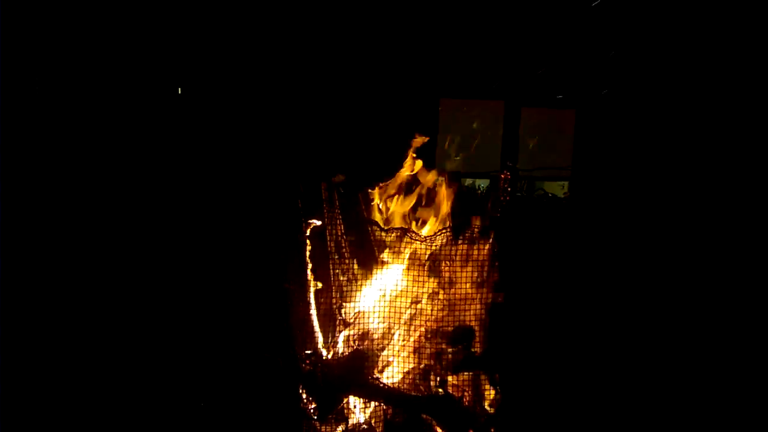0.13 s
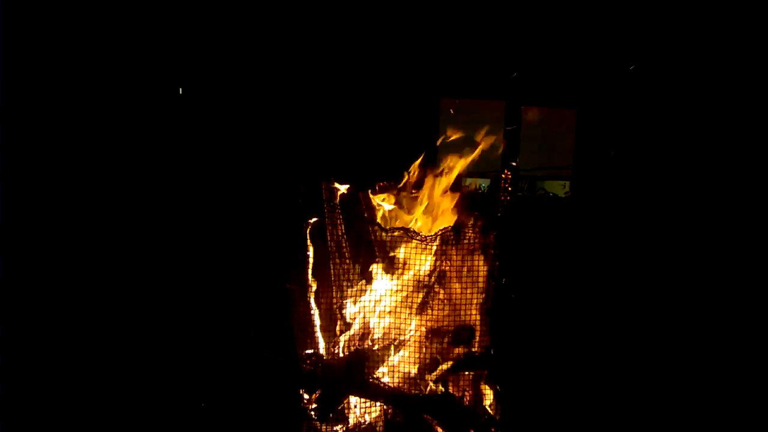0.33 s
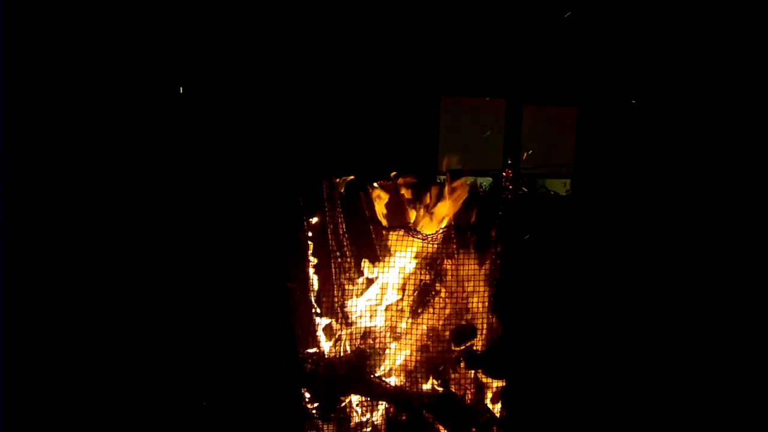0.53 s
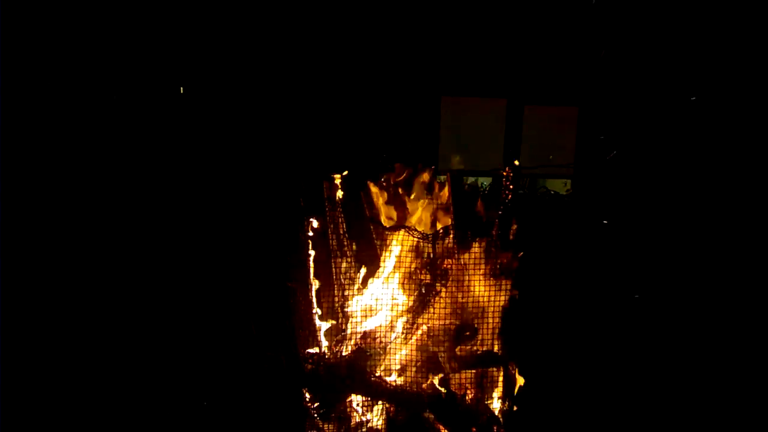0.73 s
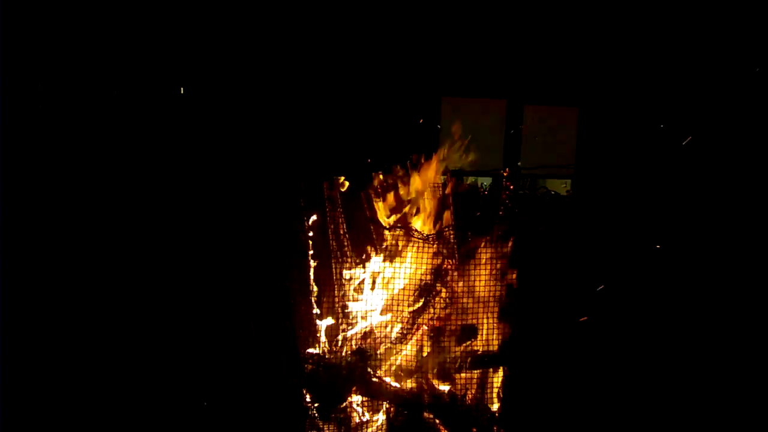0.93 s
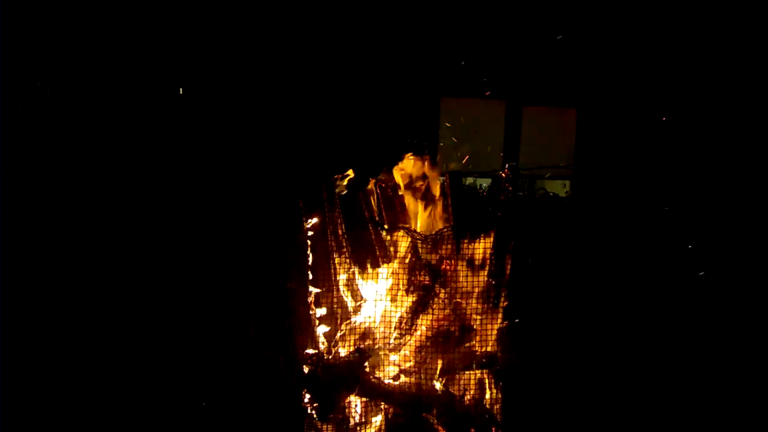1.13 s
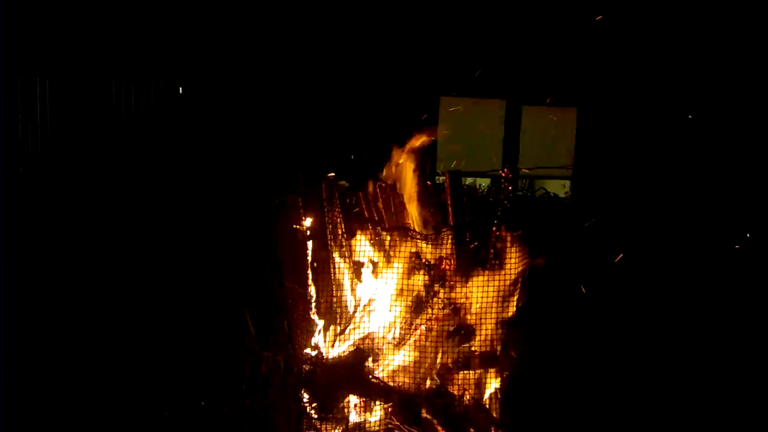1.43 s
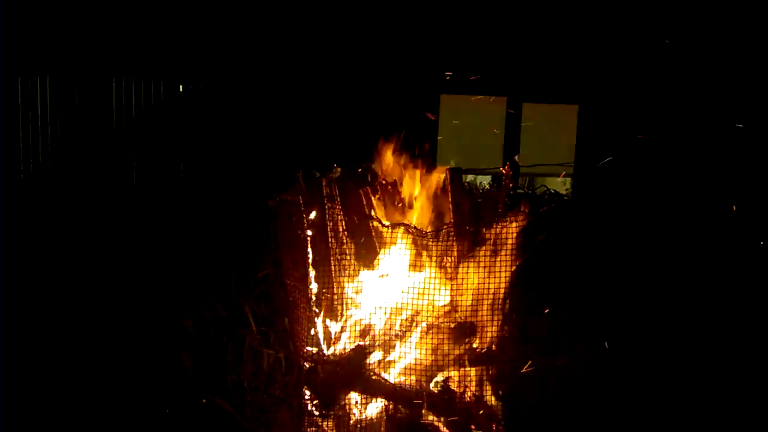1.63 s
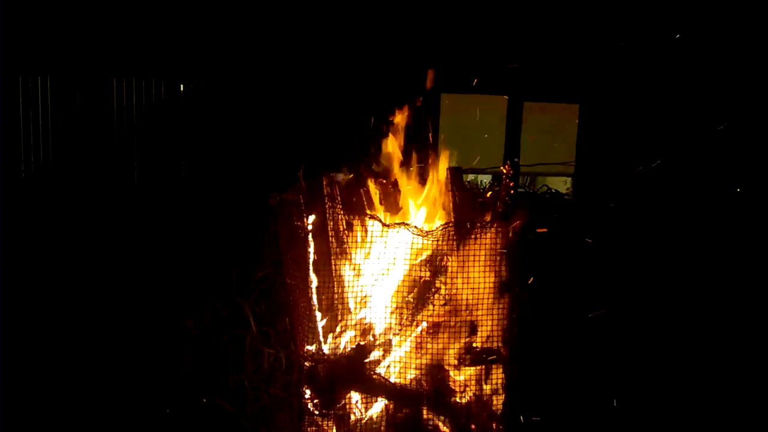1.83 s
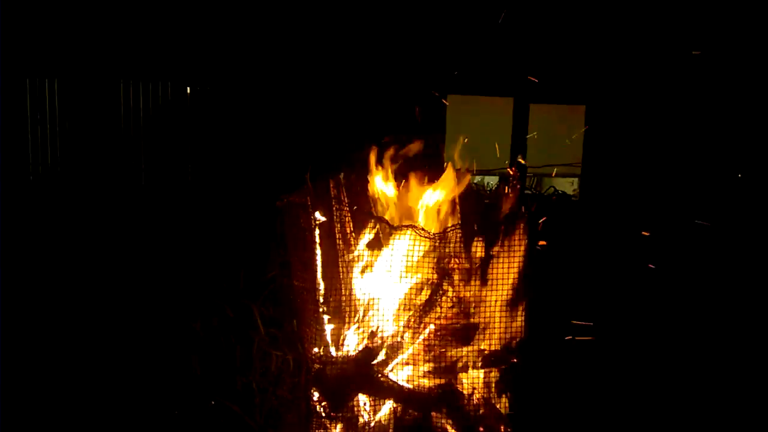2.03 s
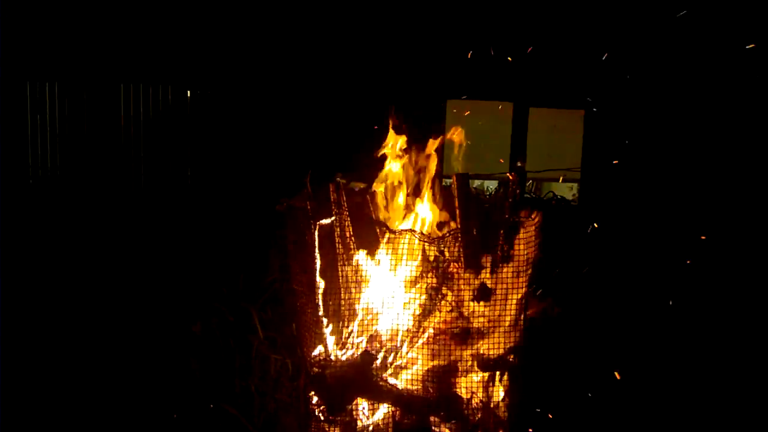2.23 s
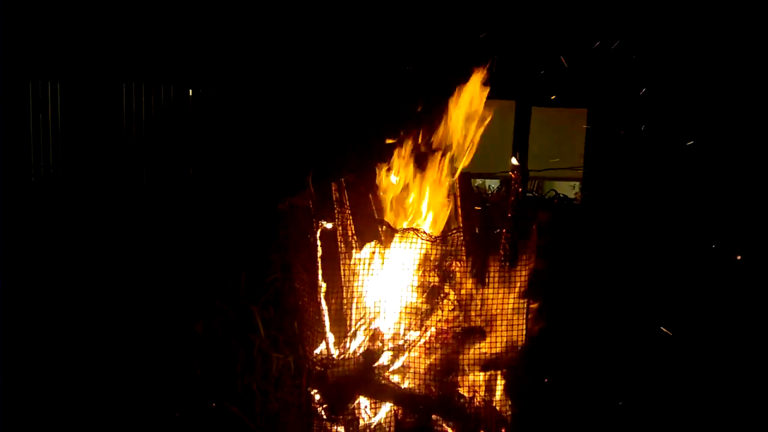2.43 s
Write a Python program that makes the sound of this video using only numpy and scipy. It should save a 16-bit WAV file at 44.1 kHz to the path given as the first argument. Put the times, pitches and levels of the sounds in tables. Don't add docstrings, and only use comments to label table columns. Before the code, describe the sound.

Burning wood crackles in quick bright snaps, clustering around one and one and a half seconds, over deep airy rumble, faint sizzle and hiss; later the flames whoosh louder with hollow low tones, outdoors, few metres away.

```python
import sys
import numpy as np
from scipy import signal
from scipy.fft import rfft, irfft, next_fast_len
from scipy.io import wavfile
from scipy.ndimage import uniform_filter1d, map_coordinates

SR = 44100
rng = np.random.default_rng(int(sys.argv[2]) if len(sys.argv) > 2 else 0)


def convert_level_to_amplitude(level_db):
    exponent = np.asarray(level_db, float) / 20
    return 10 ** exponent


def wav_record(signal):
    frames = np.transpose(np.atleast_2d(signal))
    bounded = np.clip(frames, -1, 1)
    quanta = np.round(bounded * 32767).astype(np.int16)
    wavfile.write(sys.argv[1], SR, quanta)


N = 114660


def unit(x):
    return x / np.sqrt(np.mean(x ** 2) + 1e-20)


def colour(points):
    f, db = np.transpose(points)
    return lambda hz: convert_level_to_amplitude(np.interp(np.log(hz + 1), np.log(f + 1), db))


def resonances(rows):
    def response(f):
        total = 0
        for k, (centre, width, db) in enumerate(rows):
            damping = 1j * f * width
            total = total + (-1) ** k * convert_level_to_amplitude(db) * damping / (centre ** 2 - f ** 2 + damping)
        return total
    return response


def curve(rows):
    s, value = np.transpose(rows)
    return np.interp(np.arange(N) / SR, s, value)


def filtered(x, response):
    m = next_fast_len(len(x) + SR // 4)
    spectrum = rfft(x, m) * response(np.fft.rfftfreq(m, 1 / SR))
    return irfft(spectrum, m)[:len(x)]


def rush(response, patchy_db):
    z = signal.stft(rng.standard_normal(N), nperseg=512)[2]
    patches = uniform_filter1d(rng.standard_normal(z.shape), 6, 0)
    patches = unit(uniform_filter1d(patches, 10, 1))
    noise = signal.istft(z * convert_level_to_amplitude(patchy_db * patches), nperseg=512)[1][:N]
    return unit(filtered(noise, response))


def wobble(rate):
    return map_coordinates(rng.standard_normal(400), [np.arange(N) * rate / SR])


def unsteady_tone(rows):
    s, hz, db = np.transpose(rows)
    pitch = curve(np.c_[s, hz]) * (1 + 0.006 * wobble(25.09))
    phase = 2 * np.pi * np.cumsum(pitch) / SR
    octave = convert_level_to_amplitude(-24 + 2.8 * wobble(14)) * np.sin(2 * phase)
    level_db = curve(np.c_[s, db]) + 1.2 * wobble(11.0) - 4.0
    return np.sqrt(2) * convert_level_to_amplitude(level_db) * (np.sin(phase) + octave)


def ticks(s, hz, db, cycles):
    k = np.arange(256)
    turns = hz[:, None] * k / SR
    fade = np.exp(-turns / cycles) * (1 - np.exp(-turns))
    grains = convert_level_to_amplitude(db)[:, None] * np.sin(2 * np.pi * turns) * fade
    start = np.clip(s * SR, 0, N).astype(int)
    return np.bincount((start[:, None] + k).ravel(), grains.ravel(), N + len(k))[:N]


# f/Hz, level/dB
HISS_COLOUR = [(300, 0), (5000, -5), (8500, 1.5), (13000, 3), (17000, -2)]


def microphone_hiss():
    return convert_level_to_amplitude(-79) * unit(filtered(rng.standard_normal(N), colour(HISS_COLOUR)))


# t/s, level/dB
DRAUGHT_LEVEL = [(0.0, -46), (0.11, -53.5), (0.19, -49.5), (0.28, -52), (0.51, -47.5), (0.74, -51.5),
                 (0.77, -45.5), (0.84, -53), (0.9, -49), (1.08, -50.5), (1.27, -49), (1.33, -52),
                 (1.36, -47.5), (1.47, -50.5), (1.66, -49), (1.69, -49.5), (1.91, -48.5), (2.6, -49)]
# f/Hz, level/dB (per Hz)
RUMBLE_COLOUR = [(12, -20), (25, -4.5), (42, 1), (70, -3), (130, -10.5), (300, -37), (600, -50.5)]


def draught():
    return convert_level_to_amplitude(curve(DRAUGHT_LEVEL)) * rush(colour(RUMBLE_COLOUR), patchy_db=-0.56)


# t/s, f/Hz, level/dB
AIR_THROB = [(0.0, 33.5, -49), (0.09, 33.8, -70), (0.14, 33.4, -51), (0.25, 39.3, -57), (0.32, 39.7, -53),
             (0.4, 38.2, -60), (0.45, 37.9, -40), (0.69, 38.07, -54), (0.83, 49.5, -59), (0.93, 50.76, -41),
             (1.04, 59.93, -67), (1.38, 54.2, -50), (1.56, 54.33, -70), (1.97, 46.43, -51),
             (2.19, 46.18, -48), (2.32, 50.8, -43.5), (2.46, 43.73, -52), (2.6, 43.9, -42)]


def throb():
    return unsteady_tone(AIR_THROB)


# f/Hz, level/dB (per Hz)
SIZZLE_COLOUR = [(800, -0.5), (1200, -6.5), (1950, -15), (2800, -14.5), (3400, -11.5), (6000, -14),
                 (7500, -27), (11000, -77)]


def sizzle():
    return convert_level_to_amplitude(-66) * rush(colour(SIZZLE_COLOUR), patchy_db=0.9)


# t/s, level/dB
STEAM_LEVEL = [
    (0, -71),
    (.2, -70.5),
    (.35, -72.5),
    (1.4, -75),
    (2, -78.5),
    (2.15, -73),
    (2.3, -66.5),
    (2.45, -72),
    (2.6, -68),
]
# f/Hz, width/Hz, level/dB
SPLIT_WOOD = [
    (1480, 240, 0),
    (2280, 240, -3),
]


def steam_jet():
    return convert_level_to_amplitude(curve(STEAM_LEVEL) - 2) * rush(resonances(SPLIT_WOOD), patchy_db=0.9)


# t/s, spread/s, f/Hz, level/dB
SAP_POCKETS = [
    (1.04, .035, 5900, -69),
    (1.13, .07, 5900, -72),
    (1.54, .03, 5400, -70),
    (.49, .02, 5200, -74),
    (.65, .02, 4000, -74),
    (.02, .03, 5600, -74),
]


def fizz(count=45):
    out = np.zeros(N)
    for s, spread, hz, db in SAP_POCKETS:
        when, detune, size = rng.standard_normal((3, count))
        out += ticks(s + spread * when, hz * (1 + 0.035 * detune), db - 3.5 + 2.5 * size, cycles=11.0)
    return out


def crackle(count=260):
    when = rng.random(count) * N / SR
    hz = 4600 * np.exp(0.3 * rng.standard_normal(count))
    size = np.minimum(rng.exponential(size=count), 2)
    return ticks(when, hz, -75 + 5 * size, cycles=2)


# t/s, level/dB
FLAME_LEVEL = [(0.0, -50), (0.12, -65), (0.59, -48.5), (0.62, -53.5), (1.29, -50.5), (1.32, -51),
               (1.66, -56), (1.77, -45), (1.83, -50), (1.85, -44), (1.93, -46), (2.14, -44.5),
               (2.22, -47.5), (2.45, -47.5), (2.49, -47), (2.6, -47)]
# f/Hz, width/Hz, level/dB
LOG_GAPS = [(168.7, 18, -8.5), (237.4, 51, -6), (275, 17, -6.5), (299.5, 9.9, -11.5), (343.2, 11.7, -2.5),
            (402.5, 14, -8), (536, 55, -19), (640, 12, -28.5)]
# f/Hz, level/dB (per Hz)
ROAR_COLOUR = [(60, -21), (110, -2.5), (200, -1), (300, -0.5), (450, -5.5), (600, -19.5), (900, -29),
               (1500, -90)]


def flames():
    in_gaps = rush(resonances(LOG_GAPS), patchy_db=0.5)
    in_open = convert_level_to_amplitude(-0.5) * rush(colour(ROAR_COLOUR), patchy_db=1.0)
    return convert_level_to_amplitude(curve(FLAME_LEVEL) - 4) * (in_gaps + in_open)


# t/s, f/Hz, level/dB
LARGEST_GAP = [(0, 265.6, -81), (.36, 267.4, -54), (.44, 268.6, -67), (.7, 267, -53), (.93, 268.3, -53),
               (1.0, 270, -67), (1.36, 276.5, -53.5), (1.64, 268.3, -74), (1.74, 263.8, -48),
               (1.86, 269.5, -39.5), (1.92, 268.4, -58), (2.07, 271, -50.5), (2.11, 272.9, -37.5),
               (2.17, 273.5, -41.5), (2.21, 269.8, -64), (2.31, 265, -42.5), (2.46, 271.4, -43),
               (2.51, 272.1, -64.5)]
# t/s, f/Hz, level/dB
NEXT_GAP = [(0, 314, -62), (.05, 308, -72), (.57, 296, -55.5), (.7, 297.3, -63.5), (1.3, 293.3, -58),
            (1.5, 297.2, -68.5), (1.9, 300, -58), (1.95, 300.5, -44), (2.02, 303.7, -41), (2.07, 300, -55),
            (2.45, 298, -55.5), (2.53, 299.6, -47), (2.6, 302, -54)]


def singing_gaps():
    return unsteady_tone(LARGEST_GAP) + unsteady_tone(NEXT_GAP)


TICK_LEVELS = [-8.5, 7, -2.5, 0.5]
# f/Hz, level/dB
SNAP_COLOUR = [(500, -11), (1500, 13), (2700, -25), (3500, -11), (6200, 5), (8000, -1.5), (12500, -11),
               (16000, -37)]
# f/Hz, level/dB
ANSWER_COLOUR = [(1500, -20), (3400, 0), (6000, 0), (8000, -20), (12000, -40)]


def one_pop(hz, snap_db, log_hz):
    t = np.arange(SR // 12) / SR
    late, size, cell_off, log_off = rng.standard_normal((4, 4, 1))
    tick_gap, tick_rise, ring_t60, snap_t60 = 0.0007, 0.0002, 0.0055, 0.004
    detune = 0.012
    start = tick_gap * (np.arange(4)[:, None] + 0.37 * late)
    age = np.maximum(t - start, 0)
    strength = convert_level_to_amplitude(4.6 * size + np.array(TICK_LEVELS)[:, None])
    life = (1 - np.exp(-age / tick_rise)) * strength

    tone = np.sin(2 * np.pi * hz * (1 + detune * cell_off) * t)
    for f in log_hz:
        tone = tone + convert_level_to_amplitude(-4.5) * np.sin(2 * np.pi * f * (1 + detune * log_off) * t)
    ring = (life * convert_level_to_amplitude(-60 * age / ring_t60) * tone).sum(0)

    crack = unit(filtered(rng.standard_normal(len(t)), colour(SNAP_COLOUR)))
    snap = (life * convert_level_to_amplitude(-60 * age / snap_t60)).sum(0) * crack
    blow = ring + convert_level_to_amplitude(snap_db - 3) * snap

    echo = unit(filtered(rng.standard_normal(len(t)), colour(ANSWER_COLOUR)))
    answer = convert_level_to_amplitude(-17.5 - 60 * t / 0.077) * (1 - np.exp(-t / 0.0021)) * echo
    return blow / abs(blow).max() + answer


# t/s, peak level/dB, ring f/Hz, snap over ring level/dB, log ring
# f/Hz
LOG_SHAKING_POPS = [(.0455, -46, 5850, 8, 4320), (.468, -51, 5790, 1, 4060), (.6335, -47, 4690, -6, 3550),
                    (.7309, -48, 6600, 0, 4420), (1.032, -47.5, 6200, 0, 3380), (1.0513, -44.5, 6230, -4, 5600),
                    (1.1935, -51, 3520, -12, 4600), (1.4984, -50, 5350, 3, 9150), (1.5257, -44, 6080, 0, 6960),
                    (1.5635, -49.5, 3490, -8, 5960), (2.1374, -55, 3610, -8, 5160),
                    (2.307, -52, 1532, -17, 2302), (1.5145, -53, 5080, -17, 4570), (0.639, -54, 8900, 1, 6880),
                    (2.4746, -52.5, 4850, -8, 5440), (1.3656, -53.5, 3300, -5, 4670),
                    (1.533, -63, 5050, -11, 6200)]
# t/s, peak level/dB, ring f/Hz, snap over ring level/dB
SINGLE_POPS = [(0.0105, -50.5, 5070, 7), (0.085, -53, 3220, 13), (0.4902, -56.5, 3620, -17),
               (0.62, -61, 4580, -9), (0.797, -56, 5100, -2), (0.881, -61, 6950, -9),
               (0.899, -60, 6100, -8), (1.007, -61, 6040, -9), (1.1242, -53, 5840, -3),
               (1.2146, -53.5, 6070, 4), (1.6046, -52, 3500, -12), (1.7332, -57, 3356, -12),
               (1.9754, -59, 5900, -7), (2.0011, -67, 3200, 4), (2.1753, -50, 3600, -3.5),
               (2.547, -56, 3224, 4)]
AFTERSHOCKS = [(1.5255, -51, 1400, -10, 2400), (1.5258, -47, 3520, -12, 5000),
               (1.5635, -58, 2400, -8, 5000), (1.0518, -50, 4500, -12, 3750),
               (1.5256, -51, 8700, -4, 10500), (1.5256, -53, 12400, -4, 11500),
               (1.0514, -55, 7400, -8, 11300), (.7312, -51, 5500, -8, 7500), (1.4988, -57, 8300, -4, 10400),
               (.7505, -58, 5700, -10, 4600), (.759, -59, 4500, -8, 5900), (.655, -59, 3500, -12, 4900),
               (.903, -58, 5700, -10, 5200), (1.0595, -57, 5800, -10, 6300), (1.0335, -61, 11200, -8, 9000),
               (1.388, -59, 3500, -8, 3000), (1.425, -59, 4300, -8, 4600), (1.5015, -57, 3700, -8, 5300)]


def pops():
    out = np.zeros(N + SR)
    for s, db, hz, snap_db, *log_hz in LOG_SHAKING_POPS + SINGLE_POPS + AFTERSHOCKS:
        pop = convert_level_to_amplitude(db - 1) * one_pop(hz, snap_db, log_hz)
        start = round(s * SR)
        out[start:start + len(pop)] += pop
    return out[:N]


def scene():
    air = draught() + throb()
    sap = sizzle() + steam_jet() + fizz()
    fire = flames() + singing_gaps()
    wood = crackle() + pops()
    return (air + sap + fire + wood)[None]


def band_limit(x):
    return signal.sosfilt(signal.butter(12, 17130, fs=SR, output="sos"), x)


def record(dry):
    heard = dry[0] + microphone_hiss()
    mix = filtered(heard, lambda hz: hz < 17180)[None]
    return band_limit(mix)


dry = scene()
out = record(dry)
wav_record(out)
```